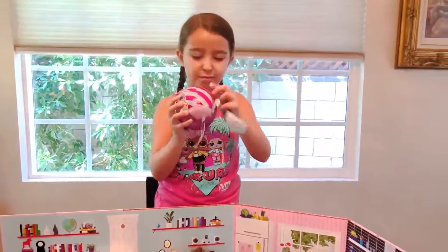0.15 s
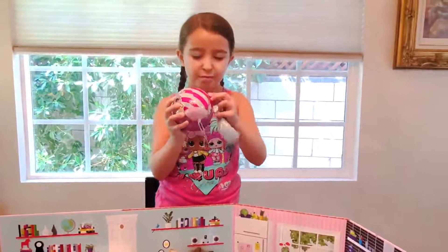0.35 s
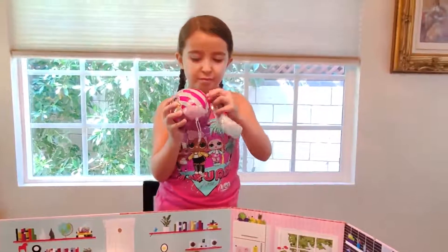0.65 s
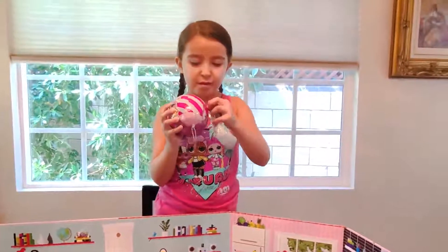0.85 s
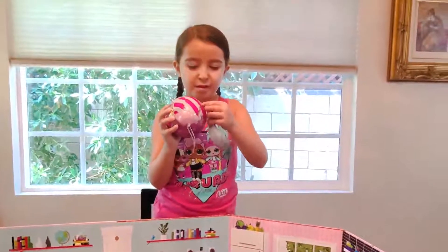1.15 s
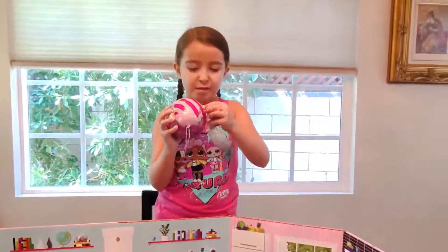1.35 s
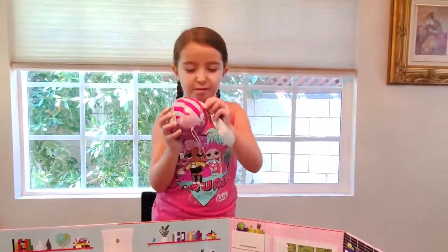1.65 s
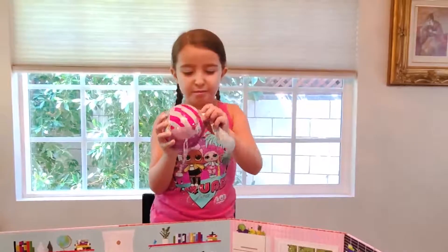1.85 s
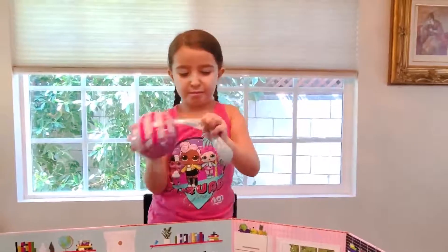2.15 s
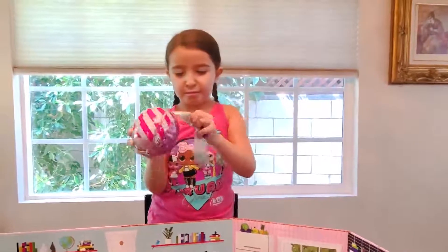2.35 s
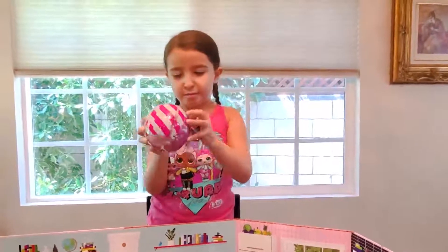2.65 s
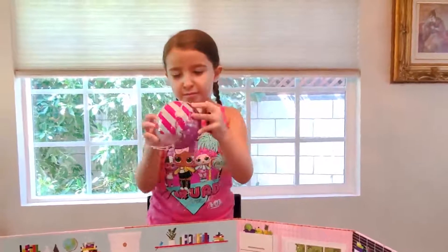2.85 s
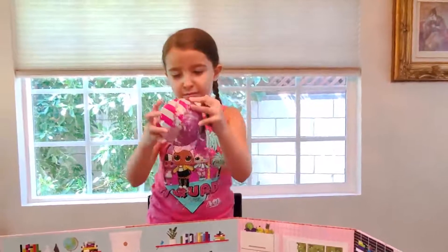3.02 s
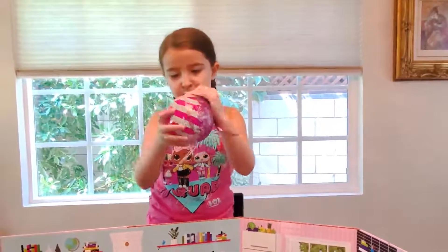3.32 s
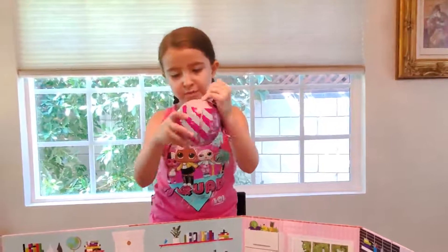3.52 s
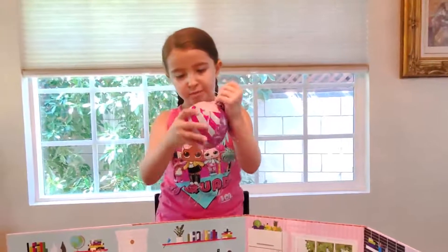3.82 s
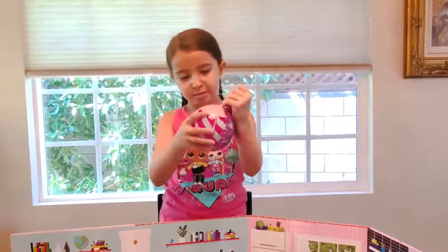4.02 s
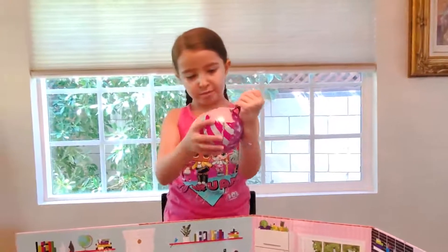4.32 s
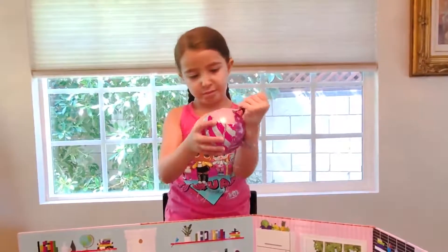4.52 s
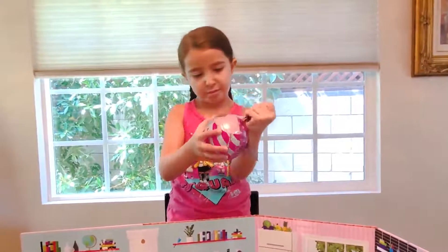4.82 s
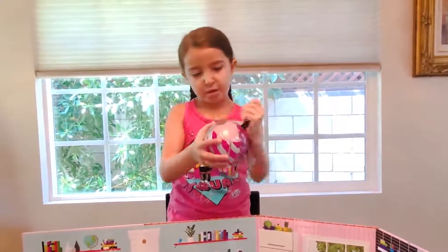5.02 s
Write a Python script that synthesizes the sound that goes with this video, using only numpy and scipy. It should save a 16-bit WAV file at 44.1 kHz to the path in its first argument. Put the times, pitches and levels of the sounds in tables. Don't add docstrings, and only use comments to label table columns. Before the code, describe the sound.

Plastic wrapping comes off a toy ball, heard from a couple of metres in stereo. First, quiet isolated ticks and crinkles; then a quick tearing run, followed by loud irregular snaps, crackling and rustling, with short lulls and a final burst. The hollow shell answers lightly, the room adds a brief tail, and soft dull thuds, rumble and hum sit far underneath.

```python
import sys
import numpy as np
from scipy import signal
from scipy.fft import rfft, irfft, next_fast_len
from scipy.io import wavfile
from scipy.ndimage import uniform_filter1d, minimum_filter1d, map_coordinates

SR = 44100
rng = np.random.default_rng(int(sys.argv[2]) if len(sys.argv) > 2 else 0)


def store_pcm(level_fs):
    pcm = np.round(np.clip(level_fs, -1, 1) * 32767).astype(np.int16)
    wavfile.write(sys.argv[1], SR, np.atleast_2d(pcm).T)


def natural_amplitude(level_db):
    exponent = np.asarray(level_db, float) / 20
    return 10 ** exponent


N = 228261
LEAD_IN = 64


def unit(x):
    return x / np.sqrt(np.mean(x ** 2) + 1e-20)


def top(x):
    return x / np.abs(x).max(axis=1, keepdims=True)


def columns(table):
    return np.array(table, float).T[:, :, None]


def along(points, hz):
    f, v = np.transpose(points)
    return np.interp(np.log(hz + 1), np.log(np.abs(f) + 1), v)


def wobble(rate):
    knots = rng.standard_normal(int(N * rate / SR) + 4)
    return map_coordinates(knots, [np.arange(N) * rate / SR])


def filtered(x, response):
    m = next_fast_len(x.shape[-1] + 4096)
    return irfft(rfft(x, m) * response(np.fft.rfftfreq(m, 1 / SR)), m)[..., :x.shape[-1]]


def causal(spectrum):
    def response(hz):
        cepstrum = irfft(np.log(natural_amplitude(along(spectrum, hz))))
        half = len(cepstrum) // 2
        cepstrum[1:half] *= 2
        cepstrum[half + 1:] = 0
        return np.exp(rfft(cepstrum))
    return response


def peak(hz, centre_hz, width_hz):
    return 1j * hz * width_hz / (centre_hz ** 2 - hz ** 2 + 1j * hz * width_hz)


def evened(x, luck):
    z = rfft(np.roll(x, LEAD_IN, axis=1))
    patches = natural_amplitude(3 * unit(uniform_filter1d(luck[:, :z.shape[1]], size=48, axis=1)))
    power = np.abs(uniform_filter1d(np.abs(z) ** 2, size=28, axis=1))
    return irfft(patches * z / np.sqrt(power + 1e-12), x.shape[1])


def bursts(start_s, length_ms, colour, count=6):
    t = np.arange(1536) / SR
    draw = rng.standard_normal((len(start_s), 2, len(t)))
    life = np.clip(length_ms, .3, 12) / 1000
    run = (t / life) ** 1.66 * np.exp(-t / life * 2.67)
    clicks = draw[:, 0] * natural_amplitude(6 * draw[:, 1]) * run
    sound = colour(evened(clicks, draw[:, 1]))
    tracks = np.zeros((count, N + len(t)))
    for k, row in enumerate(sound):
        start = round(start_s[k, 0] * SR) - LEAD_IN
        tracks[k % count, start:][:len(t)] += row
    return tracks[:, :N]


# (time [s], panel peak level [dB], tip level re panel [dB], facet pitch [Hz])
PICKED_CREASES = [(0.0503, -33.5, -23, 2350), (0.1354, -28, -26, 3450), (0.183, -29, -4.5, 3450),
                  (0.2214, -27, 5, 5130), (0.2466, -29, 0.5, 3045), (0.342, -40, -4, 3470),
                  (0.3722, -28, -11, 3530), (0.574, -50, 7.5, 3380), (0.7926, -26.5, 9.5, 2270),
                  (0.7902, -28.5, -9, 4740), (0.823, -27.5, 11.5, 3506), (0.9713, -39, 0, 3900),
                  (1.072, -31.5, 3, 5830), (1.1055, -30.5, -2, 4400), (1.1299, -31.5, 5.5, 3930),
                  (1.1641, -23, -1.5, 3570), (1.2426, -39, -12, 3600), (1.2592, -18.5, -16, 2780),
                  (1.293, -49, 7, 2920), (1.3107, -23, -8, 3180), (1.3916, -37, -3.5, 3330),
                  (1.4584, -37, -5, 3560), (1.516, -33, -10, 4530)]
UNZIPPED_CREASES = [(1.6113, -19, -13.5, 4100), (1.6542, -40, -33, 3300), (1.6718, -15, 3, 3020),
                    (1.7217, -18.5, 4.5, 3280), (1.7524, -17.5, 4, 3500), (1.8076, -13.5, -2.5, 3330),
                    (1.8538, -20, 0, 3260), (1.89, -22.5, 1, 2970), (1.9101, -23.5, 6, 3080),
                    (1.9544, -18, -8, 2460), (1.9668, -26.5, 9, 4120), (2.005, -17, 3, 5200),
                    (2.0505, -20, 5.5, 3020), (2.0714, -13.5, 6.5, 3000), (2.0964, -6.5, -23, 3800),
                    (2.1061, -36, 20, 3960), (2.1238, -8, 2.5, 3920), (2.2763, -22.5, -12, 3600)]
PEELED_CREASES = [(2.3488, -14.5, -21, 3240), (2.387, -10.5, -5, 3740), (2.409, -12, -14, 2940),
                  (2.4491, -9.5, -2, 3500), (2.4733, -12.5, 0.5, 4160), (2.528, -14, -0.5, 3170),
                  (2.686, -22, -12, 2973), (2.7041, -11.5, -4.5, 2200), (2.764, -17, -5.5, 3540),
                  (2.8019, -17.5, -17, 2380), (2.9135, -16.5, -14.5, 3550), (2.967, -24, -31, 3760),
                  (3.02, -18, -45, 3370), (3.1181, -13.5, -34, 3030), (3.1542, -22, -20, 2550),
                  (3.1703, -20.5, -22, 2870), (3.1963, -39, -3, 3290), (3.2176, -24, -13, 2640),
                  (3.2464, -20.5, -6, 1840), (3.2935, -23, -19, 4870), (3.3168, -15, -8, 4220),
                  (3.3363, -27.5, -22, 3940), (3.3678, -9.5, -11.5, 3200), (3.3869, -20, -2, 4200),
                  (3.3976, -12.5, -9.5, 3200), (3.4283, -14, -14, 3320), (3.4491, -17, 0.5, 3300),
                  (3.5222, -14, -9.5, 2900), (3.5586, -13.5, -3.5, 3440)]
TUGGED_CREASES = [(3.7941, -13, -9, 2610), (3.8594, -23, -10, 2700), (3.945, -22, 0, 3440),
                  (4.0524, -19.5, -10.5, 3200), (4.115, -29.5, -20, 2390), (4.1408, -20.5, -43, 2520),
                  (4.1943, -12, -28, 3620), (4.2016, -15.5, 1.5, 3560), (4.3136, -21.5, -11, 2370),
                  (4.3305, -11.5, -8, 3740), (4.3491, -11, -12, 3620), (4.3815, -8.5, -5.5, 3770),
                  (4.4582, -14.5, -5.5, 4150), (4.679, -31.5, 5.5, 4150), (4.6875, -17.5, -15, 3930),
                  (4.864, -34, -35, 3260), (4.893, -31.5, -37, 2970), (4.91, -28.5, -10, 2840),
                  (4.917, -27, -7, 3920), (4.925, -23, -11.5, 3700), (4.9475, -18.5, -24, 3540),
                  (4.986, -44, 5, 3910), (4.9954, -33, -15, 3290), (5.0399, -24, 3, 3440),
                  (5.0673, -11.5, -22, 3550), (5.0856, -16, -0.5, 4300), (5.106, -21, -3, 3860),
                  (5.1119, -9.5, -9, 3540), (5.1597, -12.5, -4.5, 3900)]
SMALL_CREASES = [(0.2191, -45, -15, 3240), (0.2289, -40, -2, 4810), (0.2583, -41, -12, 3000),
                 (0.3607, -31, -15, 2410), (2.7157, -13, -3, 3080), (0.6669, -37, -9, 4750),
                 (1.2374, -50, -10, 3610), (1.3313, -45, -9, 3760), (5.003, -44, 2.5, 3890),
                 (2.4247, -42, -26, 3030), (2.4837, -21, -24, 2750), (2.539, -27, -12, 3000),
                 (3.105, -41, -27, 2150), (3.1475, -34, -9, 3150), (3.386, -17, 3, 4120),
                 (3.4004, -25, -22, 3180), (3.4615, -26, -16, 3400), (3.468, -41, -12, 2230),
                 (3.5352, -33, -12, 2870), (3.595, -44, -16, 3360), (3.7328, -32, -9, 4060),
                 (3.7427, -36, -28, 3230), (4.3595, -16, -2, 4460), (4.3918, -27, -5, 4110),
                 (4.4165, -23, -5, 3760), (4.4727, -37, -10, 3450), (4.4842, -20.5, -29, 4410),
                 (5.0146, -27, -13, 2094), (5.0291, -26, -19, 2210), (5.0368, -21, -12, 3510),
                 (5.0424, -19, -5, 3070), (5.0765, -14.5, -14, 3330), (5.0864, -10, -23, 3600),
                 (5.1226, -13, -20, 3210), (5.1287, -17, -20, 3650), (5.1383, -13, -5, 3530),
                 (2.0702, -19, 2, 4060), (2.1095, -14, -5, 3970), (2.128, -10.5, -16, 4100),
                 (4.297, -45, 6, 4000), (4.3845, -15, -20, 3840), (4.4, -31, -2, 3600),
                 (4.4635, -14.5, -3, 3900), (4.334, -25, 6, 4300), (4.352, -23, -2, 3280),
                 (1.108, -33, -6, 4312), (3.433, -18, -3, 3200), (3.9514, -34, 5, 3500),
                 (3.957, -45, 7, 3530), (3.9635, -40, 6, 3570), (2.406, -18, 2, 3400),
                 (2.4515, -22, 6, 3800), (4.0695, -41, -15, 3800), (0.155, -35, -18, 3360),
                 (0.61, -41, -14, 3400)]
# (snap length [ms], shell level re snap [dB], tip sharpness [dB])
STAGE_HABITS = [
    (1.45, -22, 2),
    (1.44, -26, 15.5),
    (2.1, -28, -23.5),
    (1.97, -32.5, -13),
    (1.67, -27, 22),
]


def creases():
    stages = (PICKED_CREASES, UNZIPPED_CREASES, PEELED_CREASES, TUGGED_CREASES, SMALL_CREASES)
    rows = np.array([(*row, *habit) for table, habit in zip(stages, STAGE_HABITS) for row in table], float)
    luck = rng.standard_normal((len(rows), 2))
    rows[:, 4] *= natural_amplitude(2.5 * luck[:, 0])
    rows[:, 6] += 5 * luck[:, 1]
    return rows.T


# (frequency [Hz], width [Hz], level [dB])
BALL_RESONANCES = [(307, 2020, -16.5), (687, 178, 0.5), (869, 162, 1.5), (1077, 570, -4.5)]


def ball(hz):
    return sum((-1) ** k * natural_amplitude(db) * peak(hz, centre, width)
               for k, (centre, width, db) in enumerate(BALL_RESONANCES))


# (frequency [Hz], level [dB])
PANEL_COLOUR = [(700, -35.5), (1500, -9), (2500, -5.5), (3500, -3.5), (5000, -3), (6600, -9.5),
                (10000, -17)]


def snaps(table):
    s, db, shell_db, facet_hz, length_ms = columns(table)

    def facet(hz):
        return causal(PANEL_COLOUR)(hz) * (0.33 + peak(hz, facet_hz, 0.43 * facet_hz))

    def colour(x):
        shell = natural_amplitude(shell_db - 0.5) * top(filtered(x, ball))
        return natural_amplitude(db + 1.5) * (top(filtered(x, facet)) + shell)
    return bursts(s, length_ms, colour)


# (time [s], peak level [dB], shell level re peak [dB],
# facet pitch [Hz], length [ms])
CRUNCHES = [(0.2075, -24, -54, 3640, 7), (0.216, -18.5, -50, 5060, 5.4), (0.175, -33, -48, 2680, 15),
            (0.2219, -26, -51, 2940, 16), (0.448, -36.5, -8, 2900, 5.8),
            (0.5236, -43.5, -39, 2900, 6.3), (0.586, -37, -48, 3260, 4.8),
            (0.603, -39, -54, 3540, 2.3), (0.685, -40.5, -7, 2000, 0.95),
            (0.9962, -39.5, -45, 3280, 2.8), (1.6535, -10, -21, 1760, 1.5),
            (2.1072, -11.5, -17.5, 2640, 2.12), (2.4755, -15.5, -14.5, 3280, 7.2),
            (2.7040, -16.5, -15.5, 2000, 4.5), (3.4130, -10.5, -13.5, 2170, 0.92),
            (3.4444, -18.5, -10, 1650, 2.3), (3.4478, -13, -28, 3700, 1.5),
            (2.4045, -19, -21, 3070, 6.1), (1.8048, -21, -21, 3300, 0.98),
            (3.4511, -14.5, -17, 2210, 1.1), (4.4581, -7.5, -23, 3400, 2.2),
            (4.4628, -13.5, -39, 2970, 5.7), (4.6914, -23.5, -26, 1390, 16),
            (4.9411, -19, -32, 2300, 0.75), (4.9484, -23, -21.5, 1330, 1.5),
            (5.0992, -18, -28, 2280, 2.8)]


def film_panels(s, db, shell_db, facet_hz, length_ms):
    single = np.transpose([s, db + 0.5, shell_db, facet_hz, length_ms])
    return snaps(single) + snaps(CRUNCHES)


# (frequency [Hz], level [dB])
TIP_COLOUR = [(1200, -65), (3000, -4), (7000, -6.5), (9000, 5), (12000, 0.5), (14500, 1.5), (16500, -1)]


def ticks(table, length_ms):
    s, db, sharp_db = columns(table)

    def tip(hz):
        return causal(TIP_COLOUR)(hz) * (1 + natural_amplitude(sharp_db + 10.5) * peak(hz, 17930, 3700))
    return bursts(s, length_ms, lambda x: natural_amplitude(db + 0.5) * top(filtered(x, tip)))


# (time [s], peak level [dB], sharpness [dB])
LONG_TEARS = [(0.2224, -21, -21), (0.8, -19, -20), (0.812, -30, -11), (1.452, -18, 16), (3.956, -25, 11),
              (0.83, -18.5, -4), (2.48, -30, 2), (3.372, -25, -2), (2.1065, -5, -17), (2.1245, -12.5, -32),
              (2.4094, -10, 14), (3.4, -24, 2), (4.449, -8.5, -18), (4.4644, -12, -15), (4.6853, -9.5, 8),
              (4.6902, -2.5, -2), (4.6916, -12.5, -4), (5.12, -11.5, -25)]


def crease_tips(s, db, sharp_db):
    return ticks(np.transpose([s, db + 13, sharp_db]), length_ms=1.31) + ticks(LONG_TEARS, length_ms=6.3)


# (time [s], peak level [dB], pitch [Hz], length [ms])
SINGING_FACETS = [(0.247, -16, 3040, 1.7), (0.372, -15.5, 3630, 4.2), (0.8232, -28, 3840, 2.1),
                  (1.1045, -20, 4170, 3.8), (1.26, -16.5, 3800, 1.7), (1.3115, -26, 3020, 2.4),
                  (1.6538, -7.5, 3600, 1.7), (2.0998, -12, 3440, 1.3), (2.3484, -7.5, 3070, 1.9),
                  (2.4101, -21, 3640, 1.6), (2.5276, -14, 1700, 1.4), (2.7047, -7.5, 3930, 2),
                  (2.7656, -3, 3300, 2.1), (2.9158, -7.5, 3150, 2.6), (3.1169, -11.5, 2640, 1.2),
                  (3.4012, -9, 2000, 2.3), (3.4267, -7, 3730, 4.6), (3.452, 0, 3570, 2.7),
                  (3.5243, -12, 2900, 1.5), (3.7931, -33, 2400, 1.7), (4.1402, -18, 2180, 1.3),
                  (4.3807, -10, 4090, 3), (4.462, -3.5, 4100, 3.3), (4.9465, -21.5, 1236, 2.6),
                  (5.0669, -13, 3550, 0.89)]


def pings():
    s, db, facet_hz, length_ms = columns(SINGING_FACETS)

    def note(hz):
        return peak(hz, facet_hz, 0.22 * facet_hz) ** 2
    return bursts(s - .001, length_ms, lambda x: natural_amplitude(db - 5) * top(filtered(x, note)))


# (time [s], peak level [dB])
BALL_KNOCKS = [(0.37, -40), (0.787, -45), (1.07, -43.5), (1.309, -32), (1.654, -32), (1.956, -41),
               (2.003, -31), (2.125, -19), (2.412, -27.5), (2.449, -23), (2.473, -18), (2.527, -26),
               (2.708, -42), (2.799, -28), (3.019, -39), (3.298, -29.5), (3.364, -20), (3.399, -20),
               (3.413, -18), (3.424, -45), (3.444, -29), (3.793, -30), (4.195, -31), (4.379, -29.5),
               (4.69, -44), (5.068, -23), (5.158, -30.5)]


def knocks():
    s, db = columns(BALL_KNOCKS)
    return bursts(s, 0.77, lambda x: natural_amplitude(db - 3.5) * top(filtered(x, ball)))


def crinkles(level_db, spectrum, rate):
    dense = rate / SR * natural_amplitude(6.7 * wobble(30))
    grains = (rng.random(N) < dense) * rng.laplace(size=N)
    return natural_amplitude(level_db) * unit(filtered(grains, causal(spectrum)))


# (time [s], level [dB])
HAND_ACTIVITY = [(0.0, -44.5), (0.29, -63), (0.88, -70), (1.24, -53), (1.5, -93), (1.65, -42), (1.78, -38),
                 (1.99, -42), (2.3, -40.5), (2.58, -34.5), (2.98, -60), (3.431, -39), (3.63, -42.5),
                 (4.07, -57), (4.36, -41), (4.74, -41.5), (4.94, -64), (5.17, -30)]


def rustle():
    s, active_db = np.transpose(HAND_ACTIVITY)
    usual_db = active_db.mean()
    rub_db = np.interp(np.arange(N) / SR, s, active_db)
    fine_db = usual_db + 0.71 * (rub_db - usual_db) - 2.5
    return crinkles(rub_db - 5.5, PANEL_COLOUR, rate=1100) + crinkles(fine_db, TIP_COLOUR, rate=1900)


# (left delay [s], right delay [s], level [dB])
NEAR_ECHOES = [(.0022, 0.0024, -33), (.0031, 0.0029, -6), (.0087, 0.0068, -10)]
# (frequency [Hz], phase [radians])
LEFT_LEAD = [(0, -0.091), (1640, -0.55), (2410, 1.3), (4220, 1.14), (4570, 1.8), (5430, 0.67),
             (8350, -0.49), (16400, -0.099)]


def near(x):
    side = np.array([[.5], [-.5]])

    def path(hz):
        echoes = 1 + sum(natural_amplitude(db) * np.exp(-2j * np.pi * hz * [[left], [right]])
                         for left, right, db in NEAR_ECHOES)
        return echoes * np.exp(1j * side * along(LEFT_LEAD, hz))
    return filtered(x, path)


# (frequency [Hz], time to fall 60 dB [s])
ROOM_DECAY = [(300, 0.36), (1000, 0.44), (3000, 0.32), (8000, 0.28), (15000, 0.16)]


def room(tracks):
    hz, t, z = signal.stft(rng.standard_normal((len(tracks), 2, SR // 2)), SR, nperseg=256)
    alike = (1 / (1 + (hz / 805) ** 2))[:, None]
    z[:, 1] = alike * z[:, 0] + np.sqrt(1 - alike ** 2) * z[:, 1]
    decay = natural_amplitude(-60 * t / along(ROOM_DECAY, hz)[:, None])
    tail = signal.istft(z * decay, SR, nperseg=256)[1]
    tail *= 1 - np.exp(-(np.arange(tail.shape[-1]) / SR / .007) ** 3)
    tail /= np.sqrt(np.mean(np.sum(tail ** 2, axis=-1)))
    return signal.fftconvolve(tracks[:, None], tail, axes=2)[..., :N].sum(axis=0)


# (time [s], peak level [dB], pitch [Hz])
FLOOR_THUDS = [(0.189, -44, 72), (0.348, -43, 102), (0.589, -41, 73), (0.728, -57, 122),
               (0.847, -48, 118.4), (0.974, -47, 87.5), (1.147, -42.5, 126), (1.229, -46, 101),
               (1.398, -44, 69.6), (1.677, -39.5, 119.6), (1.968, -45, 101), (2.114, -47, 104),
               (2.577, -54, 110), (3.436, -38, 78.1), (4.05, -42, 93.6), (4.388, -41, 80.7)]


def thuds():
    s, db, hz = columns(FLOOR_THUDS)
    since = np.clip(np.arange(N) / SR - s, 0, None)
    swell = (1 - np.exp(-since / 0.011)) * np.exp(-since / 0.037)
    return natural_amplitude(db[:, 0] + 5.5) @ (swell * np.sin(2 * np.pi * hz * since))


# (frequency [Hz], level [dB per Hz])
RUMBLE_COLOUR = [(15, -34), (25, -1.5), (104, 2), (196, -11.5), (339, -16.5), (440, -22.5), (703, -22),
                 (1200, -26.5), (1560, -93), (2640, -120)]


def rumble():
    noise = rng.standard_normal((2, N))
    mid, side = unit(filtered(noise, lambda hz: natural_amplitude(along(RUMBLE_COLOUR, hz))))
    return natural_amplitude(-55.5 + 4 * wobble(3.09)) * (mid + .63 * side * [[1], [-1]])


# (frequency [Hz], rms level [dB])
APPLIANCE_TONES = [(119.3, -58.5), (60.4, -61), (86.8, -64.5)]


def hum():
    t = np.arange(N) / SR
    return sum(natural_amplitude(db + 3.0 + 0.24 * wobble(6.1)) * np.sin(2 * np.pi * hz * t + 0.33 * wobble(1.73))
               for hz, db in APPLIANCE_TONES)


# (time [s], level [dB])
APPLIANCE_LOAD = [(0.0, -80), (0.3, -58.5), (0.52, -72.5), (1.1, -64.5), (1.32, -63), (1.45, -87),
                  (1.65, -61), (1.93, -59), (2.3, -67), (2.65, -55.5), (2.85, -82), (3.05, -88),
                  (3.41, -68), (3.8, -72), (4.23, -60), (4.88, -74.5), (5.17, -78)]
# (frequency [Hz], width [Hz], level [dB])
ROOM_BOOMS = [(81, 27, -3), (185.8, 8.7, -1.5), (248.1, 21, -2), (272.7, 18, -3), (322.5, 35, -6)]


def drone():
    booms = 0
    for centre, width, db in ROOM_BOOMS:
        ringing = filtered(rng.standard_normal(N), lambda hz: peak(hz, centre, width) ** 2)
        booms = booms + natural_amplitude(db + 3.5 * wobble(5.0)) * unit(ringing)
    s, load_db = np.transpose(APPLIANCE_LOAD)
    return natural_amplitude(np.interp(np.arange(N) / SR, s, load_db) + 2.5) * unit(booms)


RIGHT_LAGS = [0, 1, 0, -1, 0, 0]


def scene():
    s, db, tip_db, hz, ms, shell_db, sharp_db = creases()
    panels = film_panels(s, db, shell_db, hz, ms)
    panels[0] += rustle()
    tips = crease_tips(s, db + tip_db, sharp_db)
    notes = pings()
    shell = knocks()
    dry_tracks = panels + notes + shell + tips
    ports = sum(np.array([track, np.roll(track, lag)]) for track, lag in zip(dry_tracks, RIGHT_LAGS))
    wet = natural_amplitude(-2) * panels + natural_amplitude(-11) * notes + natural_amplitude(-7) * shell + natural_amplitude(0.5) * tips
    t = np.arange(N) / SR
    facing = natural_amplitude(-7 * ((t > 1.6) & (t < 2.06)))
    return near(ports) + room(facing * wet) + rumble() + thuds() + hum() + drone()


def starved(x, depth_db, scatter_db, from_hz):
    hz, t, z = signal.stft(x, SR, nperseg=256)
    power = np.mean(np.abs(z) ** 2, axis=0)
    patch = np.abs(uniform_filter1d(uniform_filter1d(power, size=5, axis=0), size=3, axis=1))
    spread = uniform_filter1d(patch, size=15, axis=0)
    snap = -minimum_filter1d(-spread, size=15, origin=3, axis=1)
    luck = rng.standard_normal((len(hz) // 5 + 1, len(t) // 2 + 1)).repeat(5, 0).repeat(2, 1)
    luck = luck[:len(hz), :len(t)]
    dropped = patch < snap * natural_amplitude(2 * (scatter_db * luck - depth_db))
    dropped &= luck > 0
    dropped &= (hz > from_hz)[:, None]
    return signal.istft(z * ~dropped, SR, nperseg=256)[1][:, :N]


def top_cut(x):
    return signal.sosfilt(signal.butter(12, 16800, fs=SR, output="sos"), x)


# (frequency [Hz], left minus right level [dB])
PORT_COLOUR = [(60, -5), (110, -0.5), (200, -4), (380, 2), (700, 0), (1290, 4), (2380, 0.5), (4400, 4),
               (8120, -1), (15000, 4)]


def record(dry):
    side = np.array([[.5], [-.5]])

    def ports(hz):
        bass_cut = hz ** 2 / (hz ** 2 + 45 ** 2)
        return natural_amplitude(side * along(PORT_COLOUR, hz)) * (hz < 15940) * bass_cut
    x = filtered(dry, ports)
    x = x / (1 + np.abs(x) ** 6) ** (1 / 6)
    return top_cut(x)


dry = scene()
out = record(dry)
store_pcm(out)
```